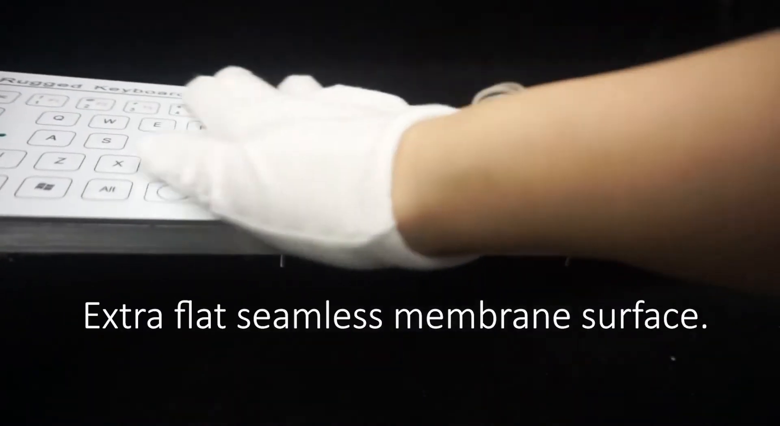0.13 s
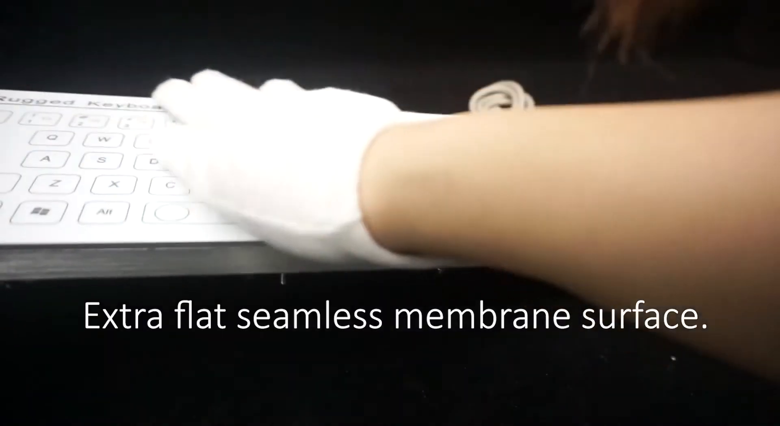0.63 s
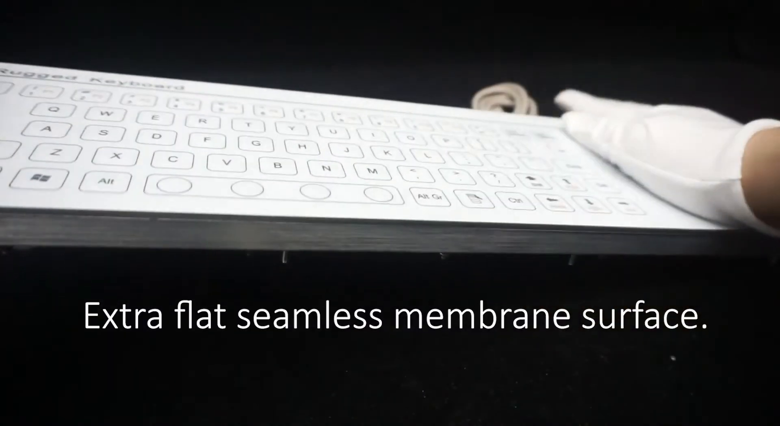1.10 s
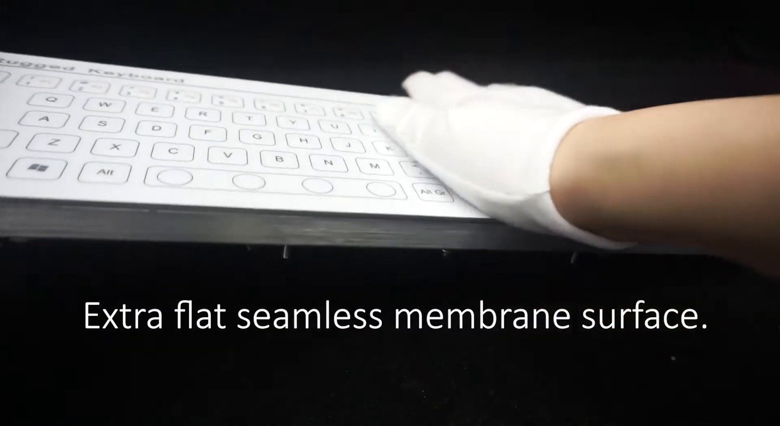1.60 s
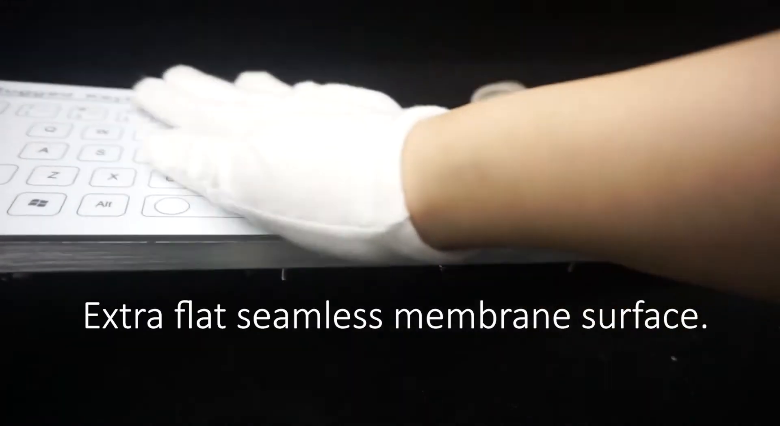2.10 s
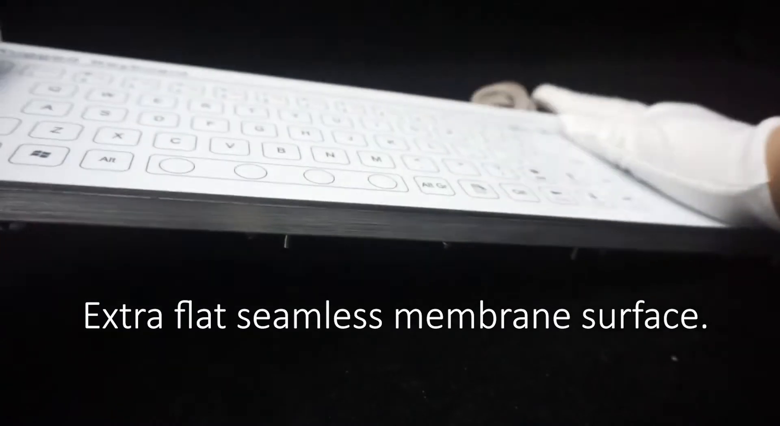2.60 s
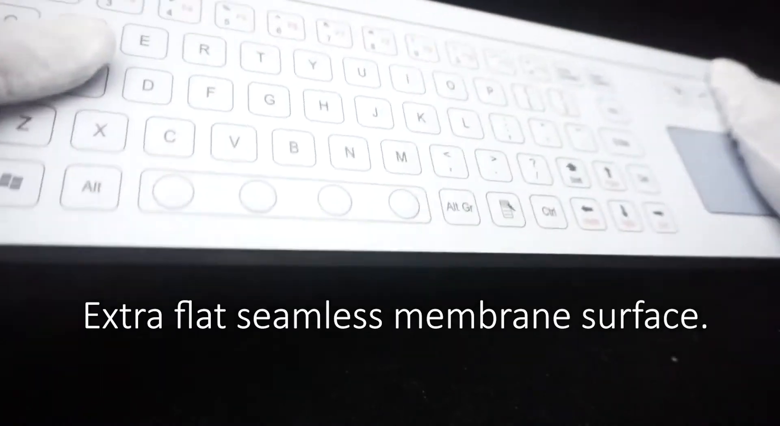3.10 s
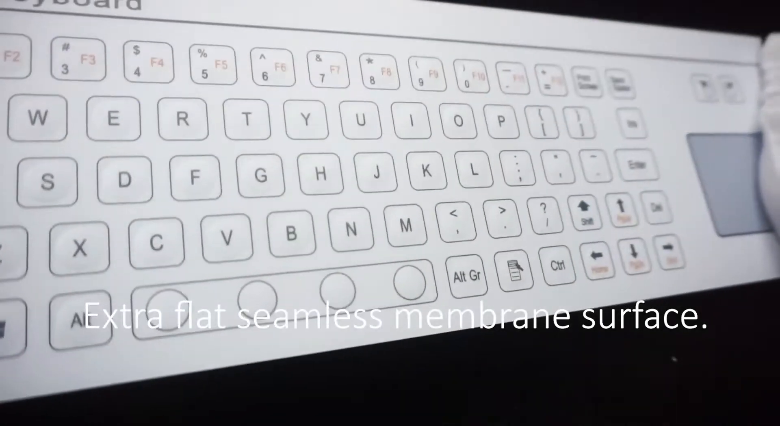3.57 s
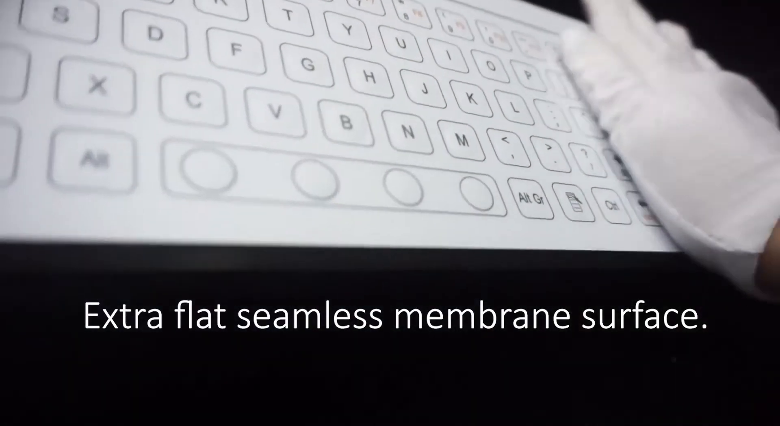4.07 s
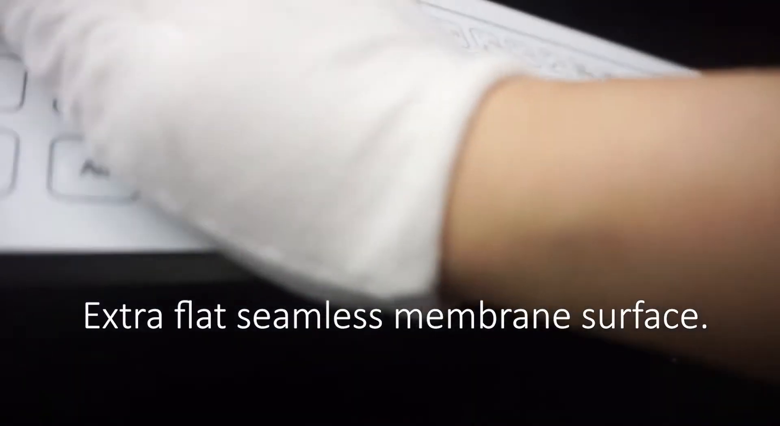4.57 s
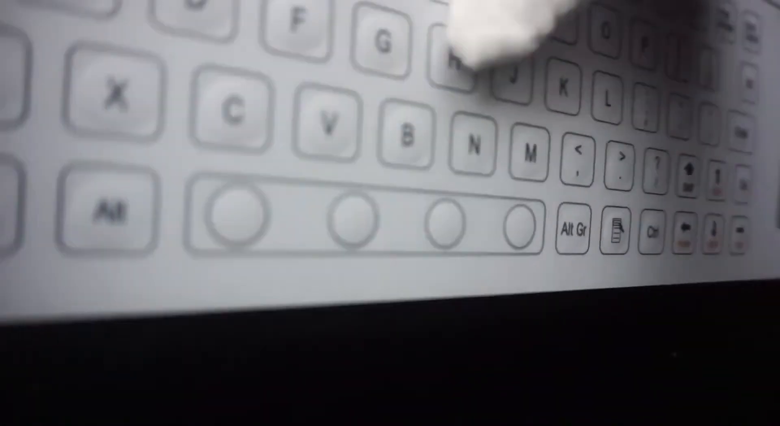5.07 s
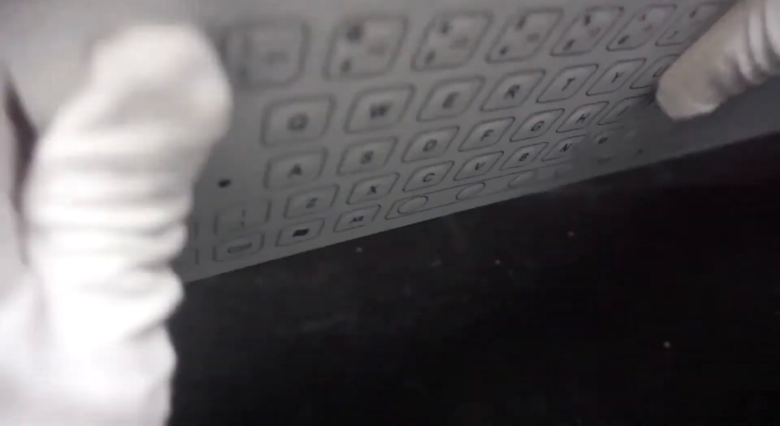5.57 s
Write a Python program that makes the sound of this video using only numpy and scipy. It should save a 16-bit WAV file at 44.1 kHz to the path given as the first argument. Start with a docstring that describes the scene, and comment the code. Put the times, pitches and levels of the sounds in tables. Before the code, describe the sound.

A cotton-gloved hand wipes back and forth over a smooth flat panel in airy, hissing strokes, ending with a cluster of clicks and knocks.

```python
"""Gloved hand on a membrane keyboard

A cotton glove wipes to and fro over a flat membrane keyboard, left of a close, small stereo microphone pair.
Fibres catch and slip as random grains in a bright hiss, the weave drags lower, and both set panel modes humming.
Finger taps and longer rough scrapes are filtered blows and noise; snags scuff in short bursts of fibre noise.
The table thumps in decaying low modes as the panel is lifted; behind lies a room of hiss and swelling rumble."""
import sys
import numpy as np
from scipy import signal
from scipy.fft import rfft, irfft, next_fast_len
from scipy.io import wavfile
from scipy.ndimage import uniform_filter1d, map_coordinates

SR = 44100
rng = np.random.default_rng(int(sys.argv[2]) if len(sys.argv) > 2 else 0)


def unload_audio(sound):
    """Save the sound as a 16-bit wav file, at the path given as the first command line argument."""
    columns = np.transpose(np.atleast_2d(sound))
    # keep every value between -1 and 1, then stretch to whole-number steps
    steps = np.round(np.clip(columns, -1, 1) * 32767)
    wavfile.write(sys.argv[1], SR, steps.astype(np.int16))


def gain_from_decibels(decibels):
    """Convert decibel values to linear amplitude factors."""
    exponent = np.asarray(decibels, float) / 20
    return 10 ** exponent


N = 250488


def unit(x):
    """Scale to rms 1."""
    return x / np.sqrt(np.mean(x ** 2) + 1e-20)


def along(points, hz):
    """Read a curve of (Hz, value) points on a log frequency axis."""
    f, value = np.transpose(points)
    return np.interp(np.log(hz + 1), np.log(f + 1), value)


def curves(rows):
    """One value per sample for each column after the time."""
    s, *columns = np.transpose(rows)
    return [np.interp(np.arange(N) / SR, s, column) for column in columns]


def wobble(rate):
    """A smooth random curve with rate knots a second."""
    knots = rng.standard_normal(int(N * rate / SR) + 4)
    return map_coordinates(knots, [np.arange(N) * rate / SR])


def filtered(x, response):
    """x times a complex response of frequency."""
    m = next_fast_len(N + SR // 2)
    return irfft(rfft(x, m) * response(np.fft.rfftfreq(m, 1 / SR)), m)[..., :N]


def coloured(x, spectrum):
    """x through a (Hz, dB) colour that closes below its first point, at rms 1."""
    closed = [(spectrum[0][0] / 2, -120)] + list(spectrum)
    return unit(filtered(x, lambda hz: gain_from_decibels(along(closed, hz))))


def slips(spiky_db, patchy_db, size):
    """Two streams of tiny stick-slips of uneven size, in patches of random strength (size: bands by frames)."""
    unevenness = np.array([wobble(2500), wobble(2500)])
    grains = rng.standard_normal((2, N)) * gain_from_decibels(spiky_db * unevenness)
    z = signal.stft(grains, nperseg=256)[2]
    field = rng.standard_normal(z.shape[1:])
    field = uniform_filter1d(field, size=size[0], axis=0)
    field = uniform_filter1d(field, size=size[1], axis=1)
    return signal.istft(z * gain_from_decibels(patchy_db * unit(field)), nperseg=256)[1][:, :N]


def near(pair, alike, lead, pan_db):
    """A source at the left: the right hears part of it, shifted by lead radians, and part scattered sound."""
    alike = np.clip(alike, 0, 1)
    direct = filtered(pair[0], lambda hz: np.exp(1j * lead) + 0 * hz)
    right = alike * direct + np.sqrt(1 - alike ** 2) * pair[1]
    gains = np.array([np.ones_like(pan_db), gain_from_decibels(-pan_db)]) / np.sqrt(1 + gain_from_decibels(-2 * pan_db))
    return 2 * np.array([pair[0], right]) * gains


def bursts(times, levels_db, lengths, tail):
    """Gates that open at once, hold for their length, then fall 60 dB per tail seconds; all end within 0.1 s."""
    gate, t = np.zeros(N + SR), np.arange(SR // 10) / SR
    for s, db, length in zip(times, levels_db, lengths):
        fall_db = 60 * np.maximum(t - length, 0) / tail
        gate[round(s * SR):][:len(t)] += gain_from_decibels(db - fall_db)
    return gate[:N]


# Likeness of left and right in the background noise. Each row: frequency in Hz, correlation (-1 to 1).
BACKGROUND_LIKENESS = [(25, 1), (60, 0.99), (130, 0.62), (220, 0.26), (380, -0.19), (700, -0.43),
                       (1400, -0.34), (3000, -0.46), (5500, -0.67), (8000, 0.98), (15000, 0.2)]


def background_noise(spectrum):
    """Smooth stereo noise, its mid and side shares set by the likeness of left and right at each frequency."""
    def angle(hz):
        return np.arccos(np.clip(along(BACKGROUND_LIKENESS, hz), -1, 1)) / 2

    noise = coloured(rng.standard_normal((2, N)), spectrum)
    mid, side = filtered(noise, lambda hz: np.array([np.cos(angle(hz)), np.sin(angle(hz))]))
    return np.array([mid + side, mid - side]) / np.std(mid)


# Colour of the room's steady hiss. Each row: frequency in Hz, relative level in dB.
ROOM_COLOUR = [(250, -2.5), (350, -0.5), (520, -1), (700, -1.5), (900, -2), (1100, -3.5), (1350, -6.5),
               (2100, -5.5), (3800, -12.5), (7000, -15), (12000, -16.5), (16500, -14.5)]
# Colour of the room's low rumble. Each row: frequency in Hz, relative level in dB.
RUMBLE_COLOUR = [(18, -10), (50, -3.5), (80, -4), (105, 0), (140, -0.5), (180, -1.5), (250, -2), (330, -13)]
# Swell of the rumble, stronger while the panel is handled. Each row: time in seconds, level in dB.
RUMBLE_SWELL = [(0.0, -54.5), (.4, -57), (2.6, -57.5), (2.95, -54.5), (3.45, -55), (3.95, -58), (5.1, -58),
                (5.35, -51.5), (5.68, -59)]


def room():
    """Steady room hiss and a slowly swelling rumble, both smooth noise spread across the stereo picture."""
    swell_db, = curves(RUMBLE_SWELL)
    rumble = gain_from_decibels(swell_db + 1.0 * wobble(7.2)) * background_noise(list(RUMBLE_COLOUR) + [(700, -55)])
    hiss = gain_from_decibels(-53) * background_noise(ROOM_COLOUR)
    return hiss + rumble


# Strokes of the hand, each dying away until the next sets off. Each row: start in seconds, rise in seconds,
# hold in seconds, relative hiss level in dB as the hold begins, the same as it ends.
WIPE_STROKES = [(-.1, 0.1, 0.35, -43.5, -43), (0.43, 0.14, 0.52, -44, -42.5), (1.27, 0.16, .51, -44, -41),
                (1.998, .14, 0.67, -42.5, -48.5), (2.866, .04, 0.066, -49, -51),
                (3.161, .19, .11, -40, -41.5), (3.684, 0.27, 0.51, -43, -36.5),
                (4.536, 0.11, 0.21, -44.5, -34), (4.894, 0.034, 0.22, -46.5, -45.5),
                (5.148, 0.023, 0.16, -38.5, -44.5), (5.314, .02, 0.32, -47, -55)]
# Brief spurts within a stroke. Each row: centre in seconds, added hiss in dB.
SPURTS = [(.2, 3.5), (.87, 2), (1.68, 2.5), (1.75, 2), (1.835, 3), (3.91, 3), (4.36, 2.5), (4.97, 3.5),
          (5.04, 7), (5.63, 5.5)]


def stroke_level():
    """Hiss level in dB, standing for hand speed: a rise, an arched hold, a fall to the turn, and the spurts."""
    turn_db, last_stop_s = -60.5, 5.69  # level as the hand turns round
    arch_db_per_s = 6.5  # swell in mid-stroke, more in long holds
    spurt_s = 0.016
    t = np.arange(N) / SR
    start, rise, hold, first_db, last_db = np.transpose(WIPE_STROKES)
    full = start + rise
    times = np.append(np.transpose([start, full, full + hold]), last_stop_s)
    levels = np.append(np.transpose([turn_db + 0 * start, first_db, last_db]), turn_db)
    level_db = np.interp(t, times, levels)
    for s, length in zip(full, hold):
        progress = np.clip((t - s) / length, 0, 1)
        level_db = level_db + arch_db_per_s * length * np.sin(np.pi * progress)
    return level_db + sum(db * np.exp(-((t - s) / spurt_s) ** 2) for s, db in SPURTS)


# Modes of the thin panel. Each row: frequency in Hz, width in Hz, peak gain in dB.
PANEL_MODES = [(657, 45, -13), (800, 45, -11), (900, 50, -5), (1110, 130, 0), (1205, 60, -7),
               (1445, 60, -8), (1560, 70, -11), (1690, 80, -9), (2000, 90, -11), (2340, 100, -12),
               (2760, 120, -12), (3150, 200, -14)]


def panel(hz):
    """Response of the thin panel: a sum of damped resonances."""
    return sum(gain_from_decibels(db) * 1j * hz * width / (centre * centre - hz * hz + 1j * hz * width)
               for centre, width, db in PANEL_MODES)


# The hand before the close pair. Each row: time in seconds, left over right in dB before each layer scales it,
# weight on the palm in dB.
HAND_PATH = [(0, 11, -9.5), (.35, 22, -7.5), (.47, 15, 3.5), (.6, 19, 2), (1.15, 4.5, -1.5),
             (1.45, 6.5, 0.5), (1.9, 15.5, -2.5), (2.13, 18, 0.5), (2.4, 9.5, 2), (2.75, 6, 2),
             (2.95, 12.5, -3), (3.15, 7, 1.5), (3.4, 19, -1.5), (3.6, 9, -10), (3.95, 8.5, 2.5),
             (4.27, 7, -6), (4.45, 17.5, 2), (4.66, 18, 1.5), (4.83, 15, -2), (5.0, 10.5, -4),
             (5.2, 11, -4), (5.38, 9.5, 9), (5.68, 14, 2.5)]
# Echo of the drag off the table while the panel lies flat, most from the near end.
# Each row: time in seconds, echo over direct (0-1).
TABLE_ECHO = [(0, 0), (.65, 0.16), (.85, 0.32), (1.5, 0.4), (1.75, 0.35), (2.1, 0.08), (2.35, 0.33),
              (2.75, 0.05), (3.1, 0.08), (5.68, 0.05)]
# Colour of the fibres' hiss, in scuffs too. Each row: frequency in Hz, relative level in dB.
FIBRE_COLOUR = [(4000, -18), (6000, -7), (8000, -3.5), (10000, -2.5), (12500, 0), (14500, -3),
                (16500, -1.5)]
# Colour of the weave's lower drag. Each row: frequency in Hz, relative level in dB.
WEAVE_COLOUR = [(1200, -13), (1700, -4), (2150, -2), (2700, -0.5), (3400, -7), (4300, -14.5)]
# Colour of the weave's upper drag. Each row: frequency in Hz, relative level in dB.
SHEEN_COLOUR = [(2800, -8.5), (3700, -2.5), (4900, 0), (6000, -6), (7500, -10.5)]


def rubbing():
    """Fibres hiss, the weave drags lower, and both shake the panel; keys under the hand make it flutter."""
    hiss_db = stroke_level()
    pan_db, weight_db = curves(HAND_PATH)
    echo, = curves(TABLE_ECHO)
    flutter = wobble(25.02)

    def layer_db(base_db, per_hiss_db, per_weight_db):
        return base_db + per_hiss_db * (hiss_db + 42) + per_weight_db * weight_db  # -42 dB: a usual stroke

    fibres = coloured(slips(spiky_db=1, patchy_db=2.0, size=(12, 6)), FIBRE_COLOUR)
    hiss = gain_from_decibels(hiss_db + 3.0 + 0.42 * flutter) * fibres

    # the gap under the moving palm favours narrow bands that linger and shift
    weave = slips(spiky_db=2, patchy_db=1.4, size=(2, 35))
    lower = gain_from_decibels(layer_db(-52.5, 0.51, 0.95) + 0.5 * flutter) * coloured(weave, WEAVE_COLOUR)
    upper = gain_from_decibels(layer_db(-49.5, 0.65, 0.36) + 0.96 * flutter) * coloured(weave, SHEEN_COLOUR)
    drag = lower + upper
    echo_s = 0.00084
    drag = (drag + echo * np.roll(drag, round(echo_s * SR), axis=1)) / np.sqrt(1 + echo ** 2)

    shake_colour = [(600, -8), (950, -3.5), (1120, -2), (1300, -10.0), (1560, 4.0), (1800, -11), (2500, -28)]
    shake = coloured(slips(spiky_db=3.0, patchy_db=2.0, size=(3, 5)), shake_colour)
    flat_hum_db = 9  # the panel hums more, per unit of echo, when it lies on the table
    hum = gain_from_decibels(layer_db(-60.5, 0.16, 0.99) + flat_hum_db * echo) * unit(filtered(shake, panel))

    # the body of the recorder shades the far side less at lower pitch
    return (near(hiss, alike=0.24, lead=0.64, pan_db=1.08 * pan_db)
            + near(drag, alike=0.65, lead=1.32, pan_db=0.92 * pan_db)
            + near(hum, alike=0.92, lead=1.93, pan_db=0.31 * pan_db))


# Finger taps and longer rough scrapes on the panel, close to the pair. Each row: start in seconds,
# relative strength in dB, contact in seconds, relative click level in dB, nearness to the panel's middle (0-1).
TAPS_AND_SCRAPES = [(.605, -44, 0.0096, -60, 0.8), (2.311, -37, 0.0063, -56, 1), (2.93, -40, 0.014, -58, 1),
                    (2.949, -35, 0.0043, -43.5, 1), (2.96, -43, 0.034, -67, 1),
                    (4.951, -29, 0.0068, -50, 0.55), (4.967, -44.5, 0.17, -56, 0.54),
                    (5.072, -33, 0.0086, -51, 0.84), (5.09, -38, 0.028, -63, 1),
                    (5.136, -39, 0.015, -59, 0.83), (5.166, -25, 0.0055, -59, 0.3),
                    (5.186, -40.5, 0.044, -44.5, 0.7), (5.222, -29, 0.0064, -54, 0.96),
                    (5.24, -38, 0.045, -63, 0.76), (5.292, -23.5, 0.0099, -33.5, 0.14),
                    (5.3103, -14, 0.0012, -23, 0.07), (5.315, -28, 0.0063, -35, 0.5),
                    (5.325, -38.5, 0.014, -54, 0.5), (5.265, -39, .008, -58, 1),
                    (5.345, -41.5, 0.055, -60, 0.9), (5.42, -41, 0.046, -57, 0.4)]


def taps_and_scrapes():
    """A blow, then rough noise for the length of contact, ring the panel; a hard edge clicks above the ring."""
    s, db, contact, edge_db, middle = np.transpose(TAPS_AND_SCRAPES)
    middle = np.clip(middle, 0.01, 0.99)
    knock = 0
    # near the middle the panel's low modes answer, near the rim its higher ones
    for share, centre_hz, wide_hz in [(middle, 740, 450), (1 - middle, 1150, 850)]:
        force_db = db + 10 * np.log10(share)
        blows = np.zeros(N)
        blows[np.round(s * SR).astype(int)] = gain_from_decibels(force_db + 27)
        rough = rng.standard_normal((2, N)) * bursts(s, force_db + 17.5, contact, tail=0.019)

        def answer(hz):
            band = 1j * hz * wide_hz / (centre_hz ** 2 - hz * hz + 1j * hz * wide_hz)
            low_cut = 1j * hz / (480 + 1j * hz)
            return panel(hz) * band ** 2 * low_cut ** 2

        knock = knock + filtered(blows + rough, answer)
    edge_colour = [(1100, -3), (1800, 2), (3000, -0.5), (5000, -7), (6500, -21), (9000, -50)]
    edge = coloured(rng.standard_normal((2, N)), edge_colour)
    click = edge * bursts(s, edge_db, contact / 4, tail=0.023)
    level = np.ones(N)
    return (near(knock, alike=0.87, lead=1.66, pan_db=4.3 * level)
            + near(click, alike=0.75, lead=1.9, pan_db=12.0 * level))


# Soft thumps through the table, equal at both microphones. Each row: start in seconds, relative level in dB.
TABLE_THUMPS = [(2.754, -40), (2.788, -41), (2.965, -42.5), (3.449, -44), (3.472, -39), (5.19, -39.5),
                (5.22, -46)]
# Lowest modes of the table top. Each row: frequency in Hz, relative level in dB, time to fall 60 dB in seconds.
TABLE_MODES = [(111, -1.5, 0.57), (140.2, 2.5, 0.26), (207, -2, .1)]


def thumps():
    """The table top answers with its lowest modes, rising softly and dying away."""
    top, t = np.zeros(N + SR), np.arange(SR // 2) / SR
    ring = sum(gain_from_decibels(level - 60 * t / t60) * np.sin(2 * np.pi * hz * t) for hz, level, t60 in TABLE_MODES)
    soft_rise = 1 - np.exp(-t / 0.0022)
    for s, db in TABLE_THUMPS:
        top[round(s * SR):][:len(t)] += gain_from_decibels(db - 5) * ring * soft_rise
    return top[:N]


# Short scuffs where the cloth snags, close to the pair. Each row: start in seconds, relative level in dB,
# length in seconds, left over right in dB.
SNAG_SCUFFS = [(2.949, -47, .001, 14), (5.168, -26, 0.0057, 20), (5.2896, -25, 0.0036, 11),
               (5.521, -35, 0.0023, 11)]


def scuffs():
    """A snag lets many fibres go at once: a short gated burst of patchy stick-slips."""
    s, db, length, pan_db = np.transpose(SNAG_SCUFFS)
    fibres = coloured(slips(spiky_db=-3.0, patchy_db=8.0, size=(12, 3)), FIBRE_COLOUR)
    scuff = fibres * bursts(s, db, length, tail=0.023)
    return near(scuff, alike=0.25, lead=1.2, pan_db=np.interp(np.arange(N) / SR, s, pan_db))


def scene():
    """Room, hand, panel and table as the pair hears them."""
    return room() + rubbing() + taps_and_scrapes() + thumps() + scuffs()


def low_pass(x):
    """Removes everything above the highest recorded frequency."""
    return signal.sosfilt(signal.butter(12, 16850, fs=SR, output="sos"), x)


def record(dry):
    """Limit the band to below 15830 Hz and finish the mix."""
    mix = filtered(dry, lambda hz: hz < 15830)
    return low_pass(mix)


dry = scene()
out = record(dry)
unload_audio(out)
```